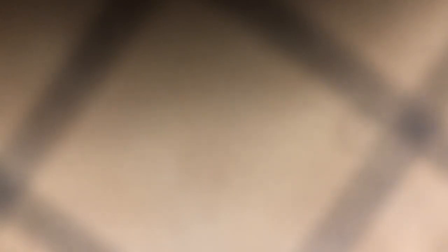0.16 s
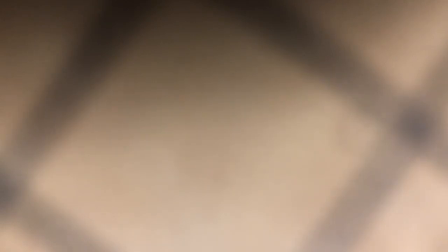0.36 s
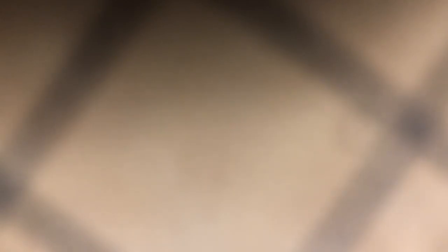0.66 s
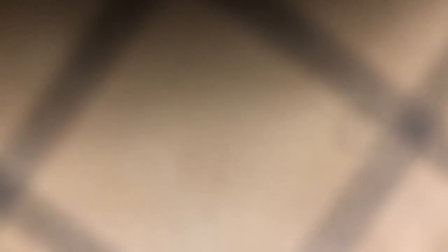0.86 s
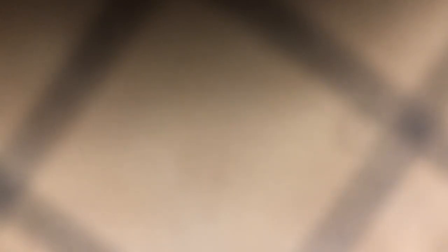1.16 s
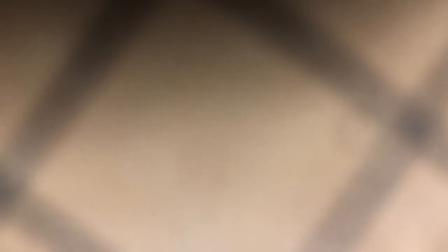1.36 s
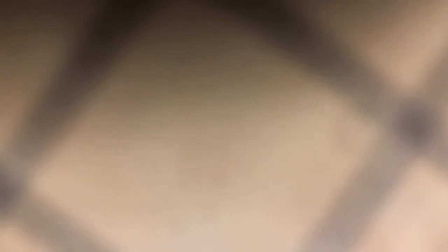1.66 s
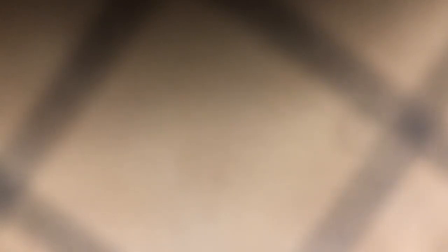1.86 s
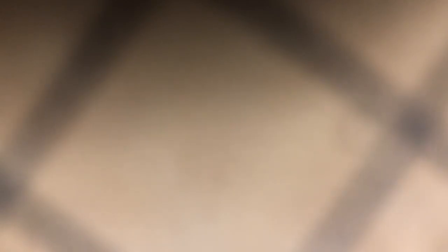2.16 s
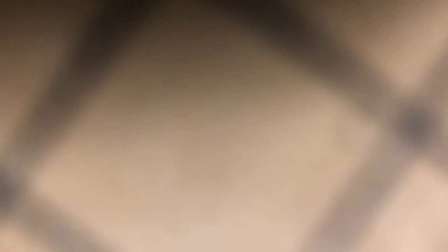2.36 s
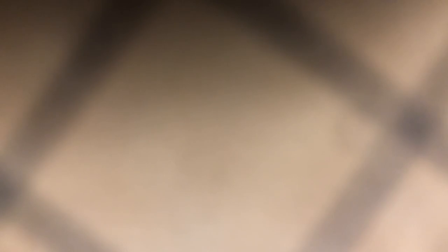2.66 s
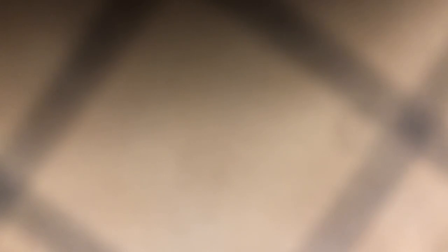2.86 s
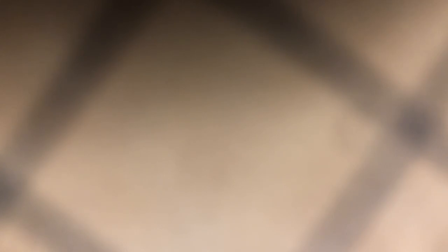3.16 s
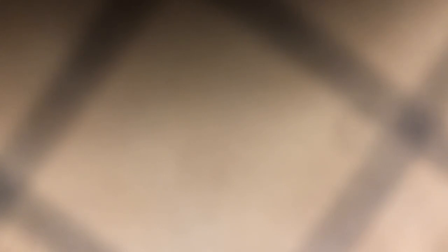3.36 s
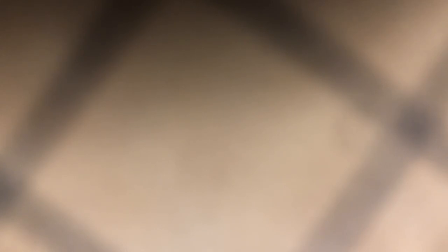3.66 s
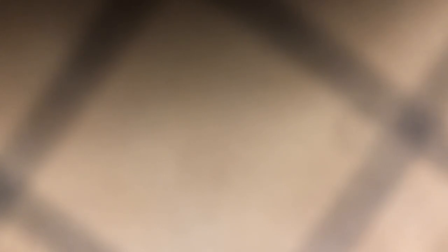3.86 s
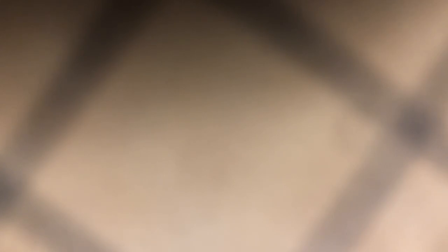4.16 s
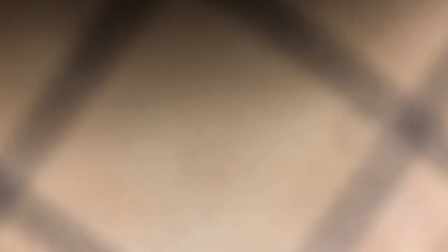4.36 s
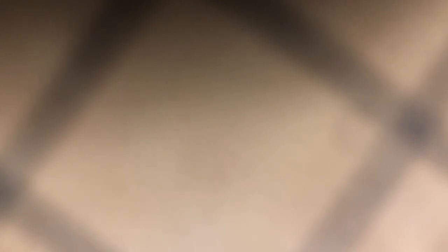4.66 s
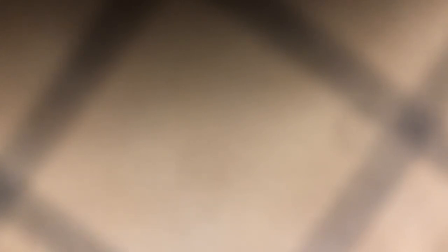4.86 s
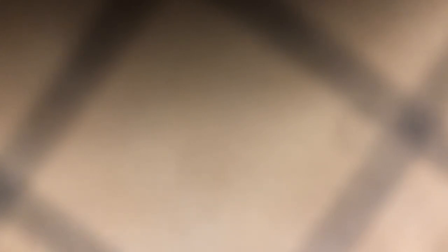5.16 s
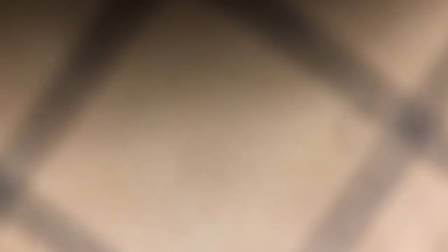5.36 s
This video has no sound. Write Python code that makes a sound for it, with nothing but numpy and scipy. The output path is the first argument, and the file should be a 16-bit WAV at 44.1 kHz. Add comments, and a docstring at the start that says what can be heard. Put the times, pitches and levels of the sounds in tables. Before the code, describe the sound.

Light taps and a sharp woody knock sound as a hand plane is set on a strip of wood. Two long strokes follow, each a dense, crackling rasp over a hollow wooden rub, with faint squeaks from the curling shaving. The strip knocks late in the first stroke, and the plane clacks down between strokes. A few soft scuffs finish. The sound is close and mono in a quiet, dry workshop.

```python
"""Light taps and a woody knock as a hand plane is set on a strip of wood, then two long shavings come off.
The iron tears fibres in a dense crackle that rings the strip and the workbench, and the curling shaving
sings faintly. The strip knocks again late in the first stroke, and the plane clacks down between the
strokes. A few soft scuffs follow in the quiet, dry workshop. The sound is close and mono."""
import sys
import numpy as np
from scipy import signal
from scipy.fft import rfft, irfft
from scipy.io import wavfile
from scipy.ndimage import map_coordinates

SR = 44100
rng = np.random.default_rng(int(sys.argv[2]) if len(sys.argv) > 2 else 0)


def inscribe(sig):
    """Save sig as 16-bit PCM at rate SR to the path in sys.argv[1].

    A 1-D sig is mono; a 2-D sig holds one channel per row.
    Samples are clipped to [-1, 1] before scaling.
    """
    pcm = np.round(np.clip(np.atleast_2d(sig).T, -1, 1) * 32767)
    wavfile.write(sys.argv[1], SR, pcm.astype(np.int16))


N = 243779
T = np.arange(N) / SR

# the two strokes: (start [s], up to speed [s], easing off [s], end [s], sole rub level [dB],
# deepest bite [s], curl in full song [s])
STROKE_CUES = [(0.524, 0.929, 2.07, 2.284, -40.5, 1.4, 0.88), (3.122, 3.423, 4.426, 4.67, -40, 3.764, 3.33)]
# thickness of the shaving as a level curve, one list a stroke: (time [s], level [dB])
SHAVING_THICKNESS = [
    [(0.6, -72.5), (0.884, -51), (1.062, -54.5), (1.388, -44), (1.464, -48.5), (1.588, -47), (1.632, -57.5),
     (1.732, -48.5), (1.936, -46.5), (1.972, -51), (2.066, -48), (2.2, -77)],
    [(3.11, -68), (3.154, -60), (3.514, -51), (3.582, -53), (3.646, -46), (4.012, -46), (4.074, -42.5),
     (4.28, -46)] + [(4.33, -52), (4.472, -58), (4.644, -66.5), (4.68, -94)],
]
# tone of the rubbing sole, the rasping iron and the snapping fibres: (frequency [Hz], level [dB])
RUB_TONE = [(88, -44.5), (150, -13.5), (262, 2), (327, -10.5), (388, 4), (492, -4), (583, 1.5), (831, -4.5),
            (1250, -28), (1620, -3), (2750, -120)]
RASP_TONE = [(650, -43.5), (1100, -5), (1180, -6.5), (1650, -4), (1790, -1), (1950, -2), (2600, -3.5),
             (3080, -12.5), (3300, -14), (4290, -8), (7260, -120)]
HISS_TONE = [(1820, -44), (3100, -15), (3700, -9.5), (4300, -4), (4600, -0.5), (5240, -1.5), (5920, -9),
             (6700, -7), (7370, -11.5), (8100, -9), (10500, -12), (12000, -10), (13800, -11.5),
             (15800, -22)]
# resonances of the strip under the plane, and of the bench: (frequency [Hz], width [Hz], level [dB])
PRESSED_STRIP_MODES = [(268.6, 7.3, 5), (414, 80, -4), (582.7, 21, 1), (729, 33, -2), (920, 24.6, -1.5)]
BENCH_MODES = [(61.5, 12, -15), (88.7, 16, 1), (115.7, 30, -8)]
# the iron catches in the grain and jolts the bench: (time [s], half-length [s], level [dB])
GRAIN_CATCHES = [(0.884, 0.017, -65), (1.195, 0.055, -39), (1.343, .075, -38), (1.69, 0.093, -44),
                 (2.01, 0.086, -44), (3.37, 0.033, -40), (3.683, .035, -44), (3.822, 0.047, -39.5),
                 (4.216, 0.063, -48.5), (4.412, 0.014, -39)]
# short squeaks and groans of the cut:
# (time [s], half-length [s], pitch [Hz], glide [Hz/s], width [Hz], level [dB])
CUT_SQUEAKS = [(0.872, 0.025, 1478, -3000, 400, -42.5), (1.281, 0.068, 2185, -5500, 340, -43),
               (1.525, 0.06, 1013, 0, 108, -37.5), (1.939, 0.023, 2650, -2.5, 220, -43.5),
               (3.338, 0.053, 1412, -2500, 292, -44.5), (3.472, 0.057, 8960, 4501, 400, -52),
               (3.51, 0.12, 4610, -4000, 350, -48), (3.631, 0.18, 743, -200, 109, -43.5),
               (3.827, 0.071, 1797, -800, 200, -38.5), (3.978, 0.049, 1101, 5999.5, 260, -38),
               (4.3, 0.23, 430, -300, 69, -48.5), (4.275, 0.022, 4900, -0.5, 1200, -40)]
# ring of the loose strip, and of the plane lying on the wood: (frequency [Hz], level [dB], t60 [s])
LOOSE_STRIP_MODES = [(256, -3, 0.15), (331.6, -2.5, 0.12), (369, 4.5, 0.057), (584.5, -13.5, 0.1),
                     (761, -13, 0.15), (956, 3.5, 0.059), (1065, -9, 0.14), (1109, -2, 0.089),
                     (1312, -9, 0.055), (1520, 0.5, 0.043), (1607, -10, 0.051), (1715, -4, 0.059),
                     (1883, -5.5, 0.029), (2070, -15.5, .05), (2360, -2, 0.05), (2400, -8, 0.061)]
PLANE_MODES = [(146.4, -2.5, 0.14), (263.6, -5, .11), (410, -5, 0.087), (516, -4.5, 0.039), (747, 1, 0.035),
               (882.6, -5.5, 0.11), (1052, -13, 0.099), (1357, -18.5, 0.059), (1791, -12.5, 0.072),
               (1960, -13.5, 0.061), (2370, -16, 0.032), (3650, -8.5, 0.024), (4560, -5.5, 0.025)]
# the strip knocks on the bench: (time [s], level [dB], low cut [Hz], high cut [Hz])
STRIP_KNOCKS = [(.4507, -10, 120.3, 5290), (2.0108, -15, 274, 2160)]
# the plane is lifted, set down and touched: (time [s], level [dB], low cut [Hz], high cut [Hz])
PLANE_TAPS = [(.149, -56, 500, 7200), (.2925, -32, 1700, 4900), (.2952, -31, 810, 13100),
              (.297, -40.5, 72, 200), (.3245, -29, 225, 334), (.340, -35.5, 239, 2500),
              (.4225, -42, 1900, 5000), (.4272, -31, 1830, 2510), (.443, -35, 2500, 5960),
              (.5125, -46.5, 1500, 6000), (2.243, -49, 698, 2142), (2.562, -61, 1500, 3000),
              (2.636, -56.5, 1210, 2800), (2.7885, -58.5, 6550, 14000), (2.8345, -25.5, 198, 6900),
              (2.8385, -21.5, 358, 1080), (3.030, -49, 500, 2050), (3.036, -36, 133, 302),
              (3.178, -51, 1184, 5050), (4.652, -44.5, 179, 448), (4.701, -49, 300, 4470),
              (5.1875, -51.5, 497, 2000), (5.2925, -44, 1030, 1800)]
# the sole skims the wood without cutting: (start [s], end [s], level [dB])
SOLE_SKIMS = [(0.026, 0.083, -66.5), (0.303, 0.432, -63.5), (0.404, 0.55, -53.5), (2.787, 2.96, -53.5),
              (3.005, 3.092, -57)]
# soft scuffs of the plane and the worker: (time [s], rise [s], fall [s], level [dB])
SOFT_SCUFFS = [(2.245, .025, 0.016, -46), (4.74, 0.054, 0.08, -59), (4.92, 0.055, 0.062, -52.5),
               (5.11, 0.026, 0.037, -40.5), (5.27, 0.083, 0.069, -50.5), (5.39, 0.038, .03, -52)]
# tone of the scuffs and of the still room: (frequency [Hz], level [dB])
SCUFF_TONE = [(59, -24), (100, 0), (140, -35), (172, -2.5), (425, -2), (472, -7.5), (718, -5), (1770, -4.5),
              (2800, -22.5), (15000, -52)]
ROOM_TONE = [(18, -47), (30, -5.5), (149, -2.5), (301, -17.5), (496, -14), (645, -19), (1660, -29),
             (1990, -24.5), (3450, -30.5), (5990, -38), (7200, -43.5), (14200, -42), (15800, -48)]

SPEED_UP_DB_PER_S, EASE_OFF_DB_PER_S, DULL_DB_PER_S = 84, 32, 19
BITE_S, BITE_RASP_DB, BITE_RUB_DB = 0.16, 4.5, 2.5  # mid-stroke the iron digs in and the sound coarsens
HISS_DB, RASP_DB, THRUM_DB = 3.5, 2.5, -2  # against the shaving's level curve
CURL_HZ, CURL_HZ_PER_S, CURL_WIDTH_HZ = 4214, 450, 460


def planing():
    """Snapping fibres hiss and rasp, the sole drives the strip, and the bench thrums under the push."""
    grain = undb(walk(35) + 0.15 * walk(220))  # the iron catches and slips in uneven grain
    rub = sole_rub()
    dull_rub = colour(rub, [(480, 3), (720, -29)])
    rasp = restless(colour(crackle(7000, 1.5), RASP_TONE), depth_db=4, rate=18, patch_hz=137.4)
    fibres = restless(colour(crackle(16000, 1.1), HISS_TONE), depth_db=4, rate=19, patch_hz=322)
    thrum, catches = bench_shudder()
    out = catches
    for stroke, shaving in zip(STROKE_CUES, SHAVING_THICKNESS):
        start, up_to_speed, easing, end, rub_db, deepest, curl_s = stroke
        thickness = undb(np.interp(T, *np.transpose(shaving))) * gate(start, end)
        digging = swell(deepest, BITE_S, BITE_S)
        hiss = fibres + shaving_song(curl_s)
        brightness = hold(start, easing, 0, DULL_DB_PER_S)  # the rub darkens as the plane slows
        friction = dull_rub + brightness * (rub - dull_rub)
        sole = push(start, up_to_speed, easing, end) * undb(rub_db + BITE_RUB_DB * digging) * friction
        iron = thickness * (undb(HISS_DB) * hiss + undb(RASP_DB + BITE_RASP_DB * digging) * rasp)
        out = out + grain * (sole + iron) + thickness * undb(THRUM_DB) * thrum
    return out


def sole_rub():
    """The woody body of the stroke: tiny slips of the sole ring the strip pressed under it."""
    slips = crackle(3500, 3.1)
    ring = unit(sum(undb(db) * resonate(slips, hz, width) for hz, width, db in PRESSED_STRIP_MODES))
    strip = undb(0.5) * edge(ring, 1400, "low")
    grit = unit(colour(crackle(3500, 3.6), RUB_TONE))
    return restless(grit + strip, depth_db=5.5, rate=14, patch_hz=94)


def bench_shudder():
    """Jolts shake the bench: returns a steady thrum, and the thudding swells where the iron catches."""
    jolts = crackle(900, 1.5)
    thrum = unit(sum(undb(db) * resonate(resonate(jolts, hz, width), hz, width)
                     for hz, width, db in BENCH_MODES))
    thud = unit(resonate(resonate(jolts, 220, 170), 220, 170))
    catching = sum(undb(db) * swell(s, half_s, half_s) for s, half_s, db in GRAIN_CATCHES)
    return thrum, (thrum + undb(-5.5) * thud) * catching


def shaving_song(curl_s):
    """The young curl sings in the plane's mouth with two overtones, rising and fading as it grows."""
    hz = CURL_HZ + CURL_HZ_PER_S * (T - curl_s)
    song = unit(sum(undb(db) * singing_band(harmonic * hz, CURL_WIDTH_HZ)
                    for harmonic, db in enumerate((0, -7, -12), start=1)))
    return song * hold(curl_s, curl_s + 0.22, rise_db_per_s=89.5, fall_db_per_s=48)


def cut_squeaks():
    """Short squeaks and groans of the cut: the iron judders, the curl glides, the shaving breaks off."""
    return sum(singing_band(hz + glide * (T - s), width) * undb(db) * swell(s, half_s, half_s)
               for s, half_s, hz, glide, width, db in CUT_SQUEAKS)


def strip_knocks():
    """The loose strip hits the bench with a hard crack and a short woody ring."""
    return blows(STRIP_KNOCKS, LOOSE_STRIP_MODES, crack_db=38, crack_hz=1970, crack_width_hz=650,
                 tick_db=11.5, tail_db=0, tail_t60=0.046, tail_hz=695, lag_s=0.0028)


def plane_taps():
    """The body of the plane clacks and ticks as it is handled on the wood."""
    return blows(PLANE_TAPS, PLANE_MODES, crack_db=15, crack_hz=2007, crack_width_hz=1300,
                 tick_db=7.5, tail_db=-4, tail_t60=0.029, tail_hz=1950, lag_s=0.0015)


def blows(hits, modes, crack_db, crack_hz, crack_width_hz, tick_db, tail_db, tail_t60, tail_hz, lag_s):
    """Each blow is a tick, a crack, ringing modes and a diffuse tail; bending waves bring the lows late."""
    size = 16384
    t, f = T[:size], np.fft.rfftfreq(size, 1 / SR)
    bending = np.exp(-4j * np.pi * lag_s * np.sqrt(f * 1000))  # lag_s is the travel time at 1 kHz
    impulse = signal.unit_impulse(size)
    crack = undb(crack_db) * resonate(impulse, crack_hz, crack_width_hz)
    tick = undb(tick_db) * edge(impulse, 3600, "high")
    damping = 1 + 0.17 * sum(push(*stroke[:4]) for stroke in STROKE_CUES)  # the plane bears down
    out = np.zeros(N + size)
    for s, db, low_cut, high_cut in hits:
        start = int(s * SR)
        ring = sum((-1) ** k * np.sin(2 * np.pi * hz * t) * undb(mode_db - 60 * t * damping[start] / t60)
                   for k, (hz, mode_db, t60) in enumerate(modes))
        wash = unit(edge(rng.standard_normal(size), tail_hz, "low", order=1))
        tail = wash * undb(tail_db - 60 * t / tail_t60)
        hit = irfft(rfft(ring + crack + tick + tail) * bending)
        hit = edge(hit, low_cut, "high", order=3)  # light touches lack bass
        hit = edge(hit, high_cut, "low")  # soft ones lack treble
        out[start:start + size] += hit * undb(db) / np.sqrt(np.sum(hit ** 2) / (0.01 * SR))  # over 10 ms
    return out[:N]


def scuffs():
    """Gritty rubbing in a few soft swells; more weight adds body faster than brightness."""
    weight = sum(undb(db) * swell(s, rise, fall) for s, rise, fall, db in SOFT_SCUFFS)
    grit = unit(colour(crackle(4800, 1.0), SCUFF_TONE))
    body = edge(grit, 1770, "low", order=6) * weight
    scratch = edge(grit, 2280, "high", order=6) * undb(-14) * weight ** 0.6
    return (body + scratch) * undb(0.92 * walk(70))


def skims():
    """A thin, bright scratch while the plane is slid into place."""
    tone = [(500, -7), (1700, 5), (4500, -4.5), (7000, -8), (13000, -4), (15500, -5)]
    scratch = unit(colour(crackle(3200, 2.9), tone))
    touch = sum(undb(db) * gate(start, end, ramp_s=0.015) for start, end, db in SOLE_SKIMS)
    return scratch * touch * undb(2.4 * walk(90))


def workshop(x, wet_db, t60, dull_hz):
    """Add a short, dull reverb that blooms after the nearest surfaces."""
    t = T[:SR // 2]
    wash = edge(rng.standard_normal(len(t)), dull_hz, "low", order=1)
    bloom = np.clip(t / 0.011, 0, 1) ** 2
    tail = wash * bloom * undb(-60 * t / t60)
    return x + undb(wet_db) * signal.fftconvolve(x, tail / np.sqrt(np.sum(tail ** 2)))[:N]


def still_room():
    """Room tone: a bed of low rumble with a faint hiss."""
    air = edge(unit(colour(rng.standard_normal(N), ROOM_TONE)), 31, "high", order=4)
    deep_rumble = unit(edge(rng.standard_normal(N), 7, "low"))
    return undb(-57) * air + undb(-65) * deep_rumble


def push(start, up_to_speed, easing, end):
    """The effort of one stroke: the plane speeds up, runs evenly, eases off and stops."""
    return gate(start, end) * hold(up_to_speed, easing, SPEED_UP_DB_PER_S, EASE_OFF_DB_PER_S)


def gate(start, end, ramp_s=0.024):
    """Open while the plane moves, with short fades."""
    return np.clip(np.minimum(T - start, end - T) / ramp_s, 0, 1)


def hold(start, end, rise_db_per_s, fall_db_per_s):
    """Attack, hold from start to end, release."""
    return undb(-rise_db_per_s * np.maximum(start - T, 0) - fall_db_per_s * np.maximum(T - end, 0))


def swell(s, rise_s, fall_s):
    """A rounded rise and fall that peaks at one."""
    return np.exp(-((T - s) / np.where(T < s, rise_s, fall_s)) ** 2)


def crackle(rate, spread_db):
    """Tiny clicks of uneven size, `rate` a second on average."""
    clicks = (rng.random(N) < rate / SR) * rng.standard_normal(N)
    return unit(clicks * undb(spread_db * rng.standard_normal(N)))


def restless(x, depth_db, rate, patch_hz):
    """Neighbouring bands swell and fade on their own as the contact moves over the grain."""
    f, t, frames = signal.stft(x, SR, nperseg=1024, noverlap=768)
    grid = np.meshgrid(f / patch_hz, t * rate, indexing="ij")
    patches = map_coordinates(rng.standard_normal((256, 256)), grid, order=1, mode="mirror")
    _, shifting = signal.istft(frames * undb(depth_db * patches), SR, nperseg=1024, noverlap=768)
    return unit(shifting[:N])


def singing_band(hz, width_hz):
    """A narrow band of noise that follows a pitch curve."""
    phase = 2 * np.pi * np.cumsum(hz) / SR
    a, b = edge(rng.standard_normal((2, N)), width_hz / 2, "low")
    return unit(a * np.cos(phase) + b * np.sin(phase))


def walk(rate):
    """Smooth random wander with a spread near one."""
    knots = rng.standard_normal(4096)
    return 1.35 * np.interp(T * rate, np.arange(len(knots)), knots)


def colour(x, points):
    """EQ through (frequency [Hz], level [dB]) points."""
    hz, db = np.transpose(points)
    f = np.fft.rfftfreq(len(x), 1 / SR) + 1
    return irfft(rfft(x) * undb(np.interp(np.log(f), np.log(hz), db)), len(x))


def resonate(x, hz, width):
    """One resonance, unity gain at its centre."""
    return signal.lfilter(*signal.iirpeak(hz, hz / width, fs=SR), x)


def edge(x, hz, kind, order=2):
    """Low-pass or high-pass."""
    return signal.sosfilt(signal.butter(order, min(hz, SR / 2 - 100), kind, fs=SR, output="sos"), x)


def undb(db):
    """Decibels to gain."""
    return 10 ** (np.asarray(db) / 20)


def unit(x):
    """Scale to an rms of one."""
    return x / np.sqrt(np.mean(x ** 2))


def scene():
    """All sources in the workshop, the same on both channels."""
    handling = strip_knocks() + plane_taps()
    sources = planing() + cut_squeaks() + skims() + handling + scuffs()
    sound = workshop(sources, wet_db=-19, t60=0.22, dull_hz=1800) + still_room()
    return np.array([sound, sound])


def record(dry):
    """Roll off the deepest bass and cut the very top steeply."""
    high_cut = signal.ellip(10, 0.2, 70, 15750, fs=SR, output="sos")
    return signal.sosfilt(high_cut, edge(dry, 30, "high"))


dry = scene()
out = record(dry)
inscribe(out)
```